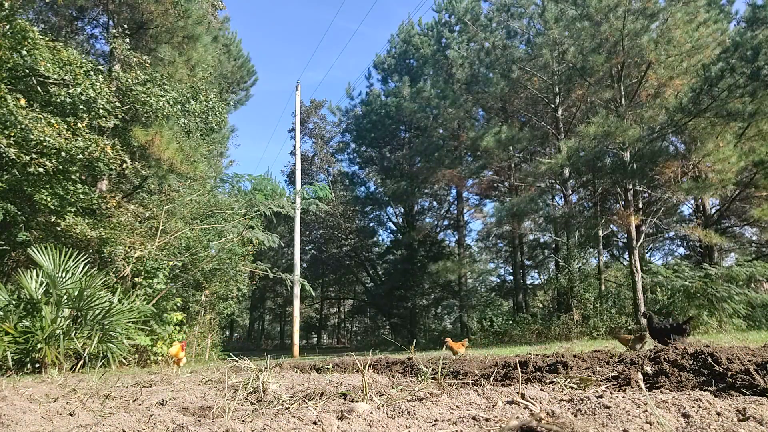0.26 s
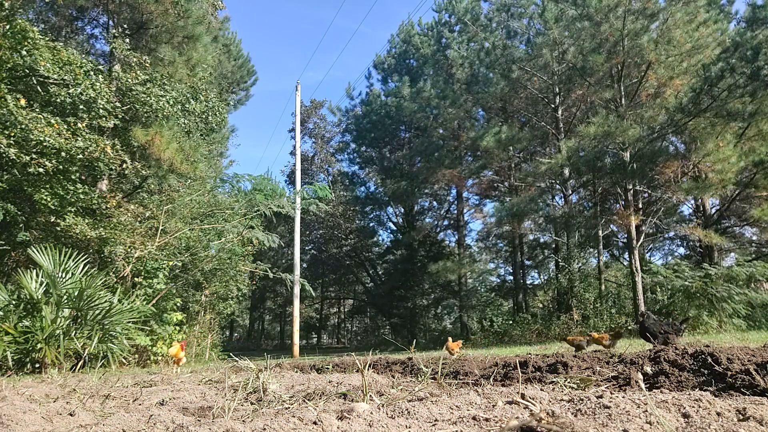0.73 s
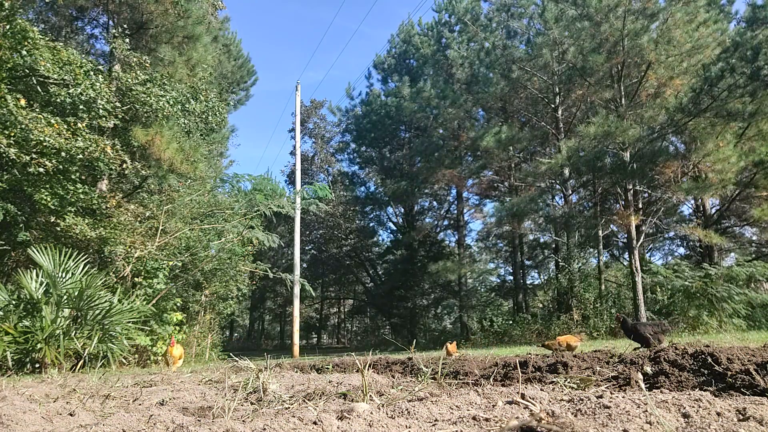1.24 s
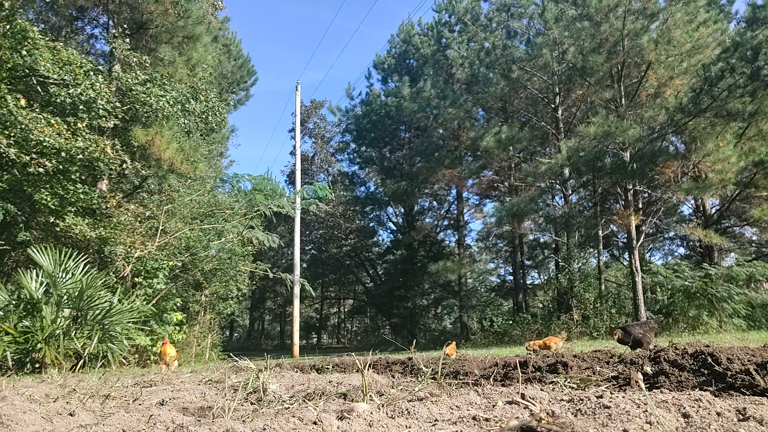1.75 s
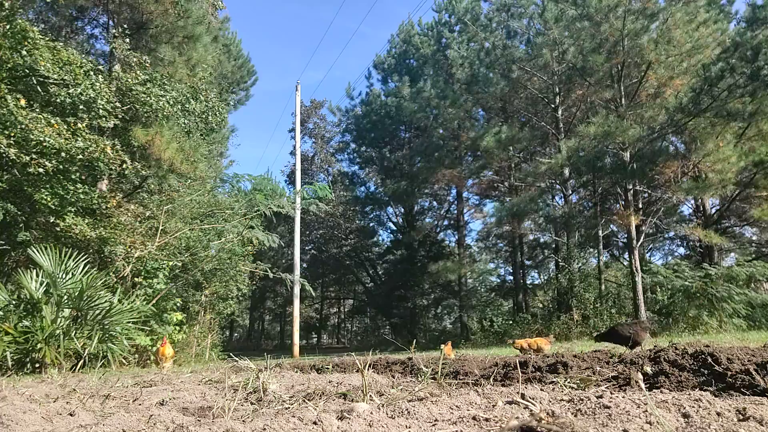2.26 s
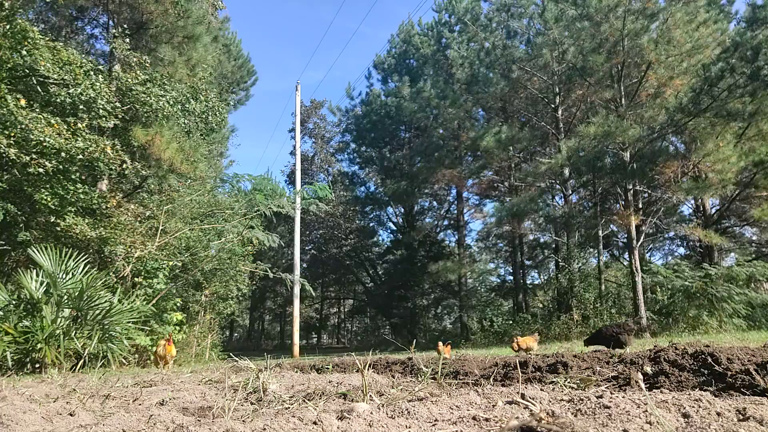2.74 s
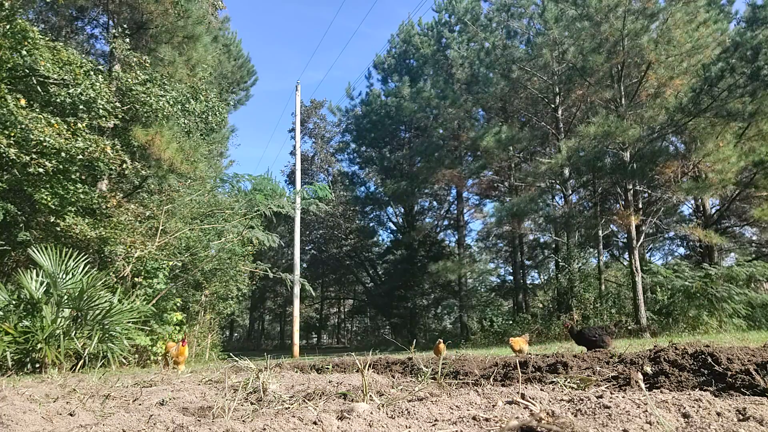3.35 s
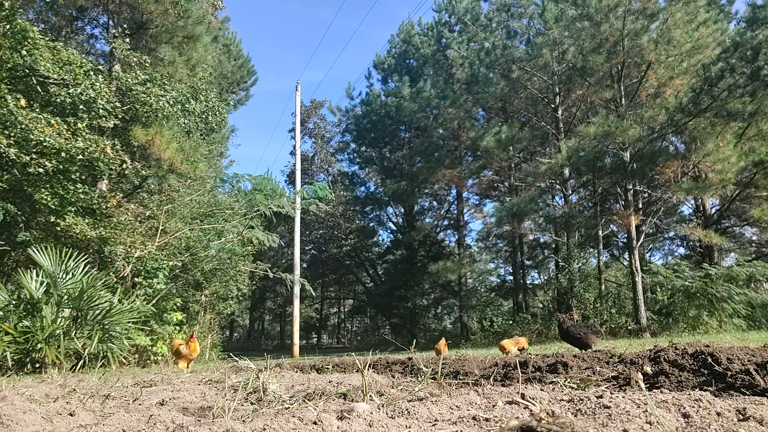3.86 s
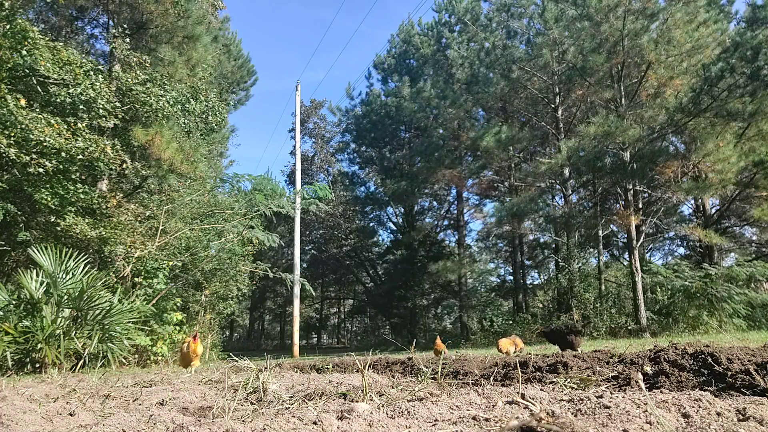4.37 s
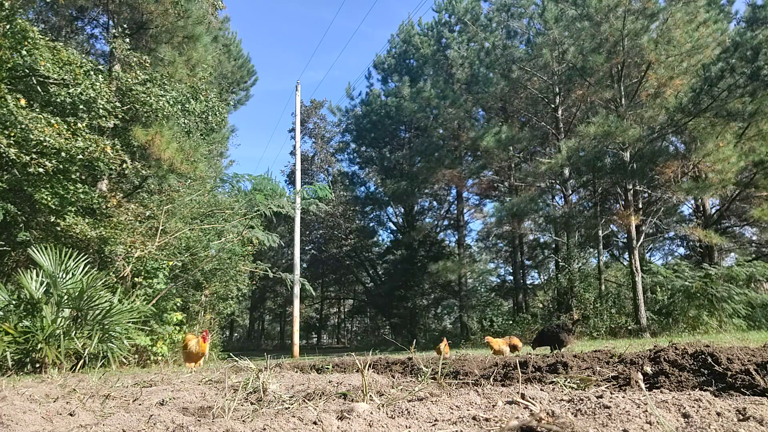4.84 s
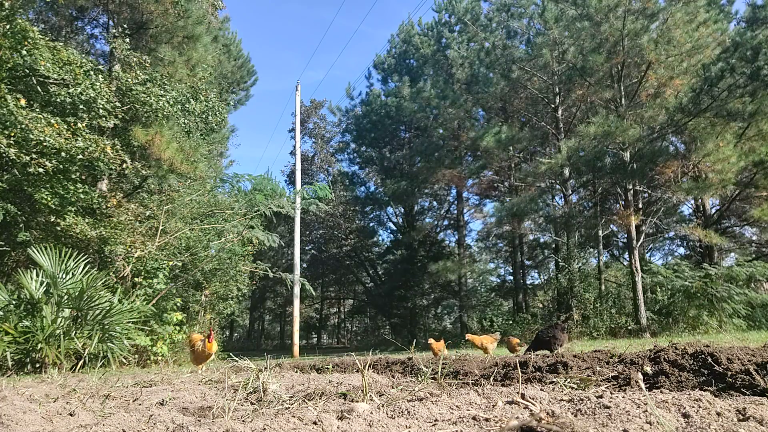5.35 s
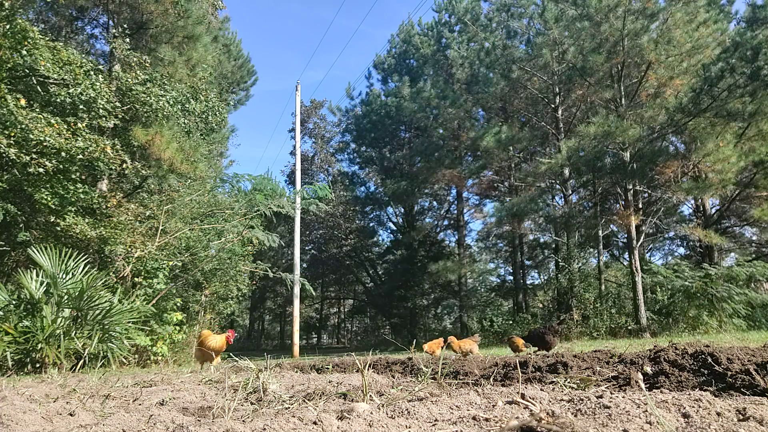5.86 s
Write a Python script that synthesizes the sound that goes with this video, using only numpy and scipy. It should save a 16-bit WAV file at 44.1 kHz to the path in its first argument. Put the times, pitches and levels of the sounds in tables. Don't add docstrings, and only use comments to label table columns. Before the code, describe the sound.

Outdoors, a small petrol tiller engine putters with harsh hissing rattle, pulls out of the dirt, softens, then returns clearer with loose clanks.

```python
import sys
import numpy as np
from scipy import signal
from scipy.fft import rfft, irfft
from scipy.io import wavfile
from scipy.ndimage import uniform_filter1d, map_coordinates

SR = 44100
rng = np.random.default_rng(int(sys.argv[2]) if len(sys.argv) > 2 else 0)


def voltage_ratio(level):
    return 10 ** (np.asarray(level, float) / 20)


def digitize_waveform(pressure):
    field = np.atleast_2d(pressure).T
    bounded = np.clip(field, -1, 1)
    quanta = np.round(bounded * 32767).astype(np.int16)
    wavfile.write(sys.argv[1], SR, quanta)


N = 269010

# time_s, firings_per_s
ENGINE_SPEED = [(0.0, 30.41), (0.56, 30.689), (0.62, 31.205), (0.91, 29.983), (1.24, 31.469),
                (1.51, 29.961), (1.9, 31.712), (2.25, 30.19), (2.37, 31.423), (2.69, 30.507),
                (2.85, 31.385), (3.02, 33.129), (3.18, 32.535), (3.42, 32.668), (3.86, 32.316),
                (5.18, 31.999), (5.32, 32.616), (6.1, 32.5)]
FIRST_FIRING_TURN = 0.568
# delay_ms, pitch_hz, width_hz, signed_size
MUFFLER_LOADED = [(2.2, 464, 576, -0.061), (2.4, 62, 23, -0.011), (5.1, 298, 130, 0.075),
                  (10.0, 143, 23, 0.078), (10.0, 575, 156, -0.038), (10.5, 197, 34, -0.113),
                  (16.3, 326, 180, 0.075), (17.8, 183, 119, -0.213), (26.7, 354, 25, -0.065)]
MUFFLER_FREE = [(0.8, 59, 45, -0.023), (1.2, 263, 216, 0.066), (4.7, 143, 76, 0.088), (4.8, 502, 51, 0.007),
                (5.7, 304, 23, 0.01), (6.0, 761, 27, -0.005), (6.4, 648, 39, 0.006), (6.5, 441, 35, -0.006),
                (13.6, 96, 270, -0.082)]
MUFFLER_FACING = [(0.4, 209, 50, 0.088), (1.6, 309, 265, 0.066), (5.3, 569, 325, 0.008),
                  (6.9, 202, 80, 0.099), (9.3, 617, 51, 0.008), (11.5, 134, 115, 0.075),
                  (14.7, 572, 215, 0.025), (18.4, 456, 40, 0.008)]
MUFFLER_SPEEDS = 30.85, 32.35, 32.5
# cycle_share, level_db
JET_FLOW_LOADED = [(0, -40), (.055, -20), (.085, -4), (.105, 0), (.13, -2), (.16, -6.5), (.2, -8),
                   (.26, -10), (.31, -15), (.37, -28), (1, -40)]
JET_FLOW_FREE = [(0, -22), (.05, -8), (.11, 0), (.18, -8), (.27, -.5), (.37, -10), (.5, -24), (.6, -13),
                 (.7, -12), (.9, -16), (1, -22)]
# pitch_hz, level_db_per_hz
RUMBLE_COLOUR_LOADED = [(30, -34), (60, -27), (150, -3.5), (300, 1.5), (500, -4.5), (780, 1.5), (1000, -4),
                        (1400, -6.5), (2000, -18), (4000, -21), (16000, -11)]
RUMBLE_COLOUR_FREE = [(30, -30), (60, -9), (150, -1.5), (300, 2), (500, 0), (740, 0), (860, -6),
                      (1200, -7.5), (2000, -17.5), (4000, -32), (7000, -39), (14500, -37), (15500, -50)]
# pitch_hz, level_db_per_hz
JET_COLOUR = [(800, -45), (1500, -13), (2200, -18), (2650, -15.5), (3000, -13.5), (4200, -22), (5300, -15),
              (5900, -5), (6600, -5), (8000, 0), (8800, 3.5), (12000, 2), (15000, 0.5), (16200, -9)]
# pitch_hz, level_db_per_hz
CLATTER_COLOUR_LOADED = [(1500, -12), (3000, -12.5), (5000, -46), (6200, -9.5), (8200, -1), (9000, 3),
                         (10600, 0), (13000, 3), (15200, -23), (16200, 4.5)]
CLATTER_COLOUR_FREE = [(1500, -13), (3000, -14.5), (4200, -34), (5300, -21), (6000, -6), (7200, 1),
                       (8200, 1), (9000, 1), (13000, 2.5), (15000, -6), (15400, -20), (16200, -7)]
RATTLE_COLOUR = [(1500, -28), (3000, -23.5), (5000, -30), (6500, -11), (8000, -10), (8700, -2.5),
                 (10600, 0.5), (13000, 4), (15200, -8.5), (16200, -17)]
# pitch_hz, width_hz, level_db
PANELS = [(10140, 70, 3), (11250, 150, 0)]
PANELS_FACING = [(9400, 100, 8), (10300, 110, 6), (11780, 80, 8), (13100, 250, 5)]
BELT_COVER = 605, 34, 1.5
SHIELD_HZ, SHIELD_WIDTH_HZ, SHIELD_REST_DB = 13615, 40, -14
# start_s, length_s, level_db over the clatter
SHIELD_SPELLS = [
    (.04, .1, -8),
    (.4, .36, -10),
    (1.06, .28, -9),
    (1.36, .34, -6),
    (1.74, .3, -12),
]
# start_s, peak_db
RATTLES = [(0.065, 2), (0.196, -26), (0.264, -31), (0.427, -14), (0.495, -22), (0.586, -11), (0.652, -10.5),
           (0.724, -8), (0.893, -4), (1.089, -10), (1.204, -15), (1.25, -18), (1.309, -10), (1.438, -2),
           (1.501, -10.5), (1.765, -19), (1.829, -13), (1.926, -9), (1.992, -17), (2.048, -24),
           (2.149, -14), (2.314, -20), (2.421, -17), (2.448, -29), (2.612, -15), (2.641, -19), (2.775, -20),
           (2.842, -10.5), (2.954, -14), (3.015, -24)]
RATTLE_T60_S, RATTLE_SHORTENS = 0.026, 1
# start_s, peak_db
CLANKS = [
    (3.07, -25),
    (4.607, -37),
    (4.886, -33),
    (5.045, -33),
    (5.401, -16.5),
    (5.445, -21),
    (5.569, -21),
    (5.999, -31),
    (6.066, -24),
]
CLANK_T60_S = 0.07
# start_s, peak_db, pitch_hz, t60_s
STONES = [
    (2.955, -24, 736, 0.14),
    (2.955, -23, 1275, 0.052),
    (3.152, -24, 264, 0.094),
]
# time_s, level_db
NEARNESS = [(0, -0.5), (.5, 1), (.9, -1.5), (1.22, 1), (1.34, -2), (1.66, -1.5), (2, -8), (2.22, -4),
            (2.55, -6.5), (2.88, -7.5), (3.1, -14.5), (3.45, -21.5), (3.7, -29), (4.12, -30), (4.35, -23),
            (4.7, -17.5), (5.45, -16), (6.1, -14.5)]
# time_s, extra_delay_us at the far port
BEARING = [(0, 22), (1.5, 2), (2.8, -19), (3.5, -47), (4.2, -22), (6.1, 1)]
# pitch_hz, level_db
FAR_PORT_DB = [(200, -1), (1200, 1.5), (2000, 4), (2600, 3.5), (3200, 1), (4500, -0.5), (6200, -1.5),
               (7500, -8), (9000, -14), (10000, -26), (12000, -27.5), (15500, -24)]
# pitch_hz, likeness (0 to 1)
FAR_PORT_LIKENESS = [(100, .995), (1000, .98), (2000, .88), (2600, .6), (3000, .87), (4500, .4), (6200, .8),
                     (9000, .7), (12000, .7), (15000, .5)]
# pitch_hz, phase_rad
FAR_PORT_PHASE = [(0, 0), (2410, -4.2), (2840, -6.1), (4050, -9.0), (5250, -9.7), (6980, -14.3),
                  (8530, -17.2), (10400, -18.5), (11600, -20.6), (13600, -24.6), (15700, -31.2),
                  (16000, -30.3)]
# pitch_hz, level_db_per_hz
AIR_COLOUR = [(20, 10), (45, 7), (200, 1.5), (3000, -12), (5400, -14.5), (6000, -4.5), (9000, -12),
              (15000, -25), (15500, -30)]
AIR_DB = -50.5
LOW_CUT_HZ, HIGH_CUT_HZ = 53, 15790

LIFT_S, LIFT_TAKES_S = 2.84, 0.24
TURN_S, TURN_TAKES_S = 4.75, 0.69
EASE_DB, EASE_S = -1.5, 0.49
# free_and_near_db, added_under_load_db, share of the nearness followed
THUMP_LEVEL, RUMBLE_LEVEL, HISS_LEVEL = (-29, 0.51, 0.064), (-26.5, 2, 0.31), (-17, 0, 1)
PUFF_LEVEL = 7.8, 5.26, 0.26
PUFF_BODY_LEVEL = 4.7, -2, -0.11
BODY_LAG_S = 0.0014
CLOSE_DB, CLOSE_S = 3, 1.1
WALL_S, WALL_LASTS_S, WALL_DB, OPEN_DB = 3.46, 0.56, 3.5, -1


def evened(x):
    return x / np.sqrt(np.mean(x ** 2) + 1e-20)


def smoothed(x, size):
    return uniform_filter1d(uniform_filter1d(x, size=size), size=size)


def curve(table):
    time_s, value = np.transpose(table)
    return np.interp(np.arange(N) / SR, time_s, value)


def read(points):
    hz, value = np.transpose(points)
    return np.interp(np.log(np.fft.rfftfreq(N, 1 / SR) + 1), np.log(hz + 1), value)


def coloured(x, points):
    return evened(irfft(rfft(x) * voltage_ratio(read(points)), N))


def band(hz, width_hz, db):
    return voltage_ratio(db) ** 2 / (1 + (2 * (np.fft.rfftfreq(N, 1 / SR) - hz) / width_hz) ** 2)


def lift(x, low_hz, high_hz, db):
    hz = np.fft.rfftfreq(N, 1 / SR)
    part = 1 / (1 + (low_hz / (hz + 1)) ** 8) / (1 + (hz / high_hz) ** 8)
    return x + irfft(rfft(x) * part, N) * (voltage_ratio(db) - 1)


def ramp(start, takes):
    return np.clip((np.arange(N) / SR - start) / takes, 0, 1)


def loaded():
    return 1 - ramp(LIFT_S, LIFT_TAKES_S)


def turned():
    return ramp(TURN_S, TURN_TAKES_S)


def eased():
    u = np.maximum(np.arange(N) / SR - LIFT_S - 0.1, 0) / EASE_S
    return EASE_DB * 2 * u * np.exp(1 - 2 * u)


def level_db(free_db, load_db, share):
    return free_db + load_db * loaded() + share * curve(NEARNESS)


def crank():
    return np.cumsum(curve(ENGINE_SPEED)) / SR + 1 - FIRST_FIRING_TURN


def muffler_cycle(chambers, speed):
    t, wave = np.arange(4 * 1024) / (1024 * speed), 0
    for delay_ms, hz, width, size in chambers:
        u = np.maximum(t - delay_ms / 1000, 0)
        swell = np.pi * width * u * np.exp(1 - np.pi * width * u)
        wave = wave + size * swell * np.sin(2 * np.pi * hz * u)
    return evened(wave.reshape(4, 1024).sum(0))


def thump(turns):
    load, facing = loaded(), turned()
    strength, slip = rng.standard_normal((int(turns[-1]) + 2, 2)).T
    firing = np.arange(len(slip))
    angle = turns + 0.00033 * np.interp(turns, firing, slip)
    mufflers = MUFFLER_LOADED, MUFFLER_FREE, MUFFLER_FACING
    waves = [muffler_cycle(*pair) for pair in zip(mufflers, MUFFLER_SPEEDS)]
    in_soil, free, free_facing = [np.interp(angle, np.arange(1024) / 1024, wave, period=1) for wave in waves]
    out = load * in_soil + (1 - load - facing) * free + facing * free_facing
    out /= np.sqrt(smoothed(out ** 2, 4200))
    uneven_db = 0.35 * np.interp(turns, firing, strength)
    return out * voltage_ratio(level_db(*THUMP_LEVEL) + eased() + 3.0 + uneven_db)


def rumble(turns):
    load, noise = loaded(), rng.standard_normal((2, N))
    throb = 1 + 0.088 * np.cos(2 * np.pi * (turns - 0.2))
    body = load * coloured(noise, RUMBLE_COLOUR_LOADED) + (1 - load) * coloured(noise, RUMBLE_COLOUR_FREE)
    body += turned() * irfft(rfft(body) * band(*BELT_COVER), N)
    return body * throb * voltage_ratio(level_db(*RUMBLE_LEVEL) + 0.37 * eased() - 5.0)


def valve(turns):
    load = loaded()
    in_soil = voltage_ratio(np.interp(turns % 1, *np.transpose(JET_FLOW_LOADED)))
    free = voltage_ratio(np.interp(turns % 1, *np.transpose(JET_FLOW_FREE)))
    strength = voltage_ratio(1.2 * rng.standard_normal(int(turns[-1]) + 1))
    return (load * in_soil + (1 - load) * free) * strength[turns.astype(int)]


def jet(gate):
    keep, noise = np.exp(-1 / (BODY_LAG_S * SR)), rng.standard_normal((2, N))
    slow_gate = np.sqrt(signal.lfilter([1 - keep], [1, -keep], gate ** 2))
    low = np.fft.rfftfreq(N, 1 / SR) < 5500
    top = irfft(rfft(coloured(noise * gate, JET_COLOUR)) * ~low, N)
    body = irfft(rfft(coloured(noise * slow_gate, JET_COLOUR)) * low, N)
    top = lift(top, 9100, 20000, -5.0 * (1 - loaded()))
    puff = top + body * voltage_ratio(level_db(*PUFF_BODY_LEVEL))
    return puff * voltage_ratio(level_db(*PUFF_LEVEL) + 3.8 * eased() - 3.8 * turned() - 8.0)


def metal(shake, panels, colour):
    rings = np.sqrt(1 + sum(band(*panel) for panel in panels))
    return coloured(irfft(rfft(rng.standard_normal((2, N)) * shake) * rings, N), colour)


def shield_gain():
    gain = voltage_ratio(SHIELD_REST_DB) * loaded()
    for start, length, db in SHIELD_SPELLS:
        gain = gain + voltage_ratio(db) * (ramp(start, 0.03) - ramp(start + length, 0.1))
    return gain


def clatter():
    load, facing = loaded(), turned()
    bite = evened(smoothed(rng.standard_normal(N), 2500))
    struck = rng.random(N) < 90 / SR
    jolts = struck * voltage_ratio(2.6 * np.minimum(rng.exponential(1, N), 3)) * (0.34 + 0.29 * load)
    decaying = signal.lfilter([1], [1, -np.exp(-1 / (0.0037 * SR))], jolts)
    shake = (0.5 + decaying) * voltage_ratio(0.49 * load * bite)
    panels = np.sqrt(load) * metal(shake, PANELS, CLATTER_COLOUR_LOADED)
    panels += np.sqrt(facing) * metal(shake, PANELS_FACING, CLATTER_COLOUR_FREE)
    panels += np.sqrt(1 - load - facing) * metal(shake, PANELS, CLATTER_COLOUR_FREE)
    blows = rng.standard_normal((2, N)) * (0.75 + shake ** 2)
    shield = evened(irfft(rfft(blows) * np.sqrt(band(SHIELD_HZ, SHIELD_WIDTH_HZ, 0)), N))
    return panels + shield * shield_gain()


def rattles():
    shake, t = np.zeros(N + SR), np.arange(SR // 8) / SR
    blows = [(s, db, RATTLE_T60_S * voltage_ratio(-RATTLE_SHORTENS * db)) for s, db in RATTLES]
    blows += [(s, db, CLANK_T60_S) for s, db in CLANKS]
    for s, db, t60 in blows:
        shake[round(s * SR):][:len(t)] += voltage_ratio(db - 60 * t / t60) * np.minimum(t / 0.0013, 1)
    shake = shake[:N]
    return metal(shake, PANELS, RATTLE_COLOUR) * np.sqrt(np.mean(shake ** 2)) * voltage_ratio(-4.0)


def knocks():
    out, t = np.zeros(N + SR), np.arange(SR // 4) / SR
    for s, db, hz, t60 in STONES:
        ring = np.sin(2 * np.pi * hz * t) * voltage_ratio(db - 60 * t / t60)
        out[round(s * SR):][:len(t)] += ring * np.minimum(t / 0.0082, 1)
    return out[:N]


def scene():
    turns = crank()
    hiss = jet(valve(turns)) + clatter()
    hiss *= voltage_ratio(level_db(*HISS_LEVEL)) / np.sqrt(smoothed(hiss[0] ** 2, 9000))
    thrown_db = WALL_DB * (ramp(WALL_S, 0.15) - ramp(WALL_S + WALL_LASTS_S, 0.43))
    thrown_db += OPEN_DB * (1 - loaded() - turned())
    exhaust = lift(thump(turns), 183, 2000, thrown_db)
    noise = lift(rumble(turns) + hiss, 690, 6800, CLOSE_DB * (1 - ramp(0, CLOSE_S)))
    return exhaust + noise + rattles() + knocks()


def low_pass(x):
    return signal.sosfilt(signal.butter(12, 16470, fs=SR, output="sos"), x)


def record(dry):
    direct, scattered = rfft(dry)
    hz = np.fft.rfftfreq(N, 1 / SR)
    same = np.clip(read(FAR_PORT_LIKENESS), 0, 1)
    lag = np.exp(1j * np.interp(hz, *np.transpose(FAR_PORT_PHASE)))
    left = (same * direct + np.sqrt(1 - same ** 2) * scattered) * voltage_ratio(read(FAR_PORT_DB)) * lag
    heard_at = np.arange(N) - curve(BEARING) * SR / 1e6
    left = map_coordinates(irfft(left, N), [heard_at], order=3, mode="nearest")
    ports = 1.3 * np.tanh(np.array([left, dry[0]]) / 1.3)
    air = coloured(rng.standard_normal((2, N)), AIR_COLOUR) * voltage_ratio(AIR_DB)
    edge = 1 / (1 + (hz / HIGH_CUT_HZ) ** 500) / (1 + (LOW_CUT_HZ / (hz + 1)) ** 5.6)
    return low_pass(irfft(rfft(ports + air) * edge, N))


dry = scene()
out = record(dry)
digitize_waveform(out)
```